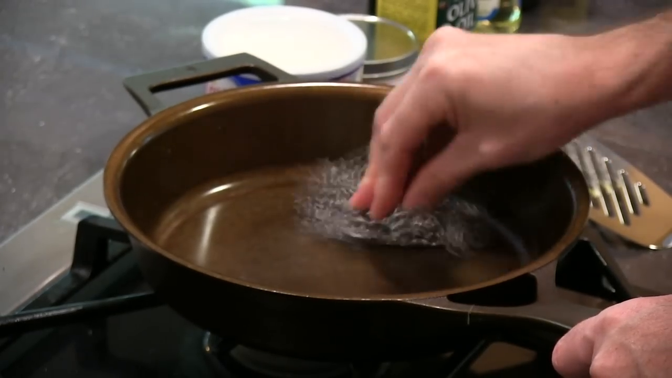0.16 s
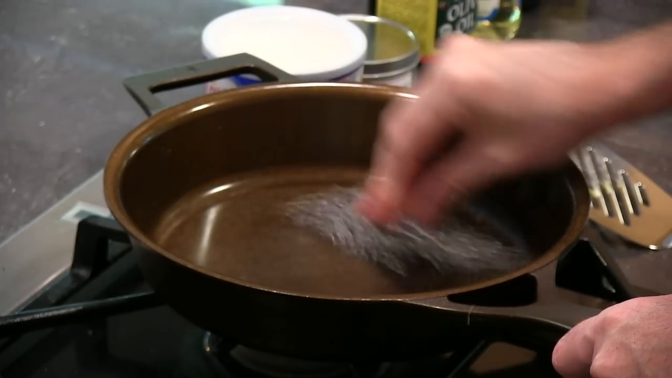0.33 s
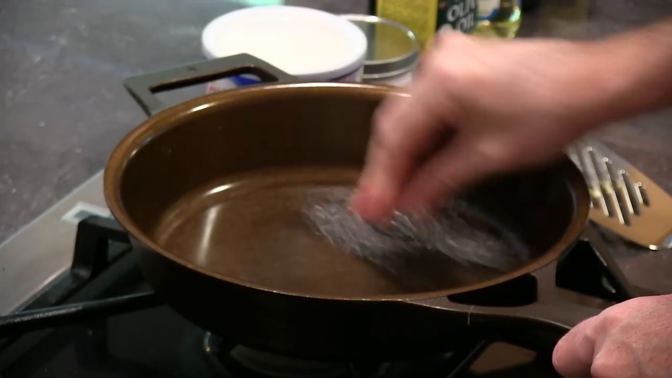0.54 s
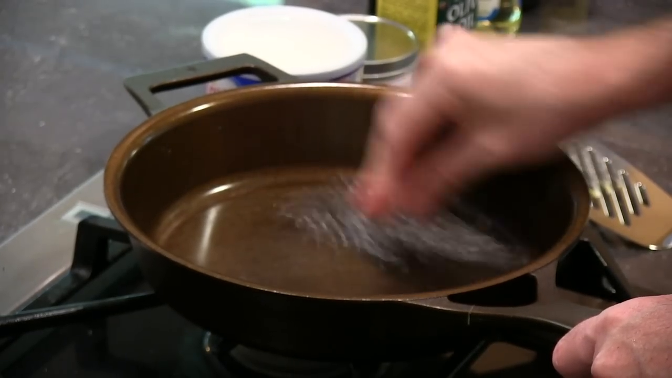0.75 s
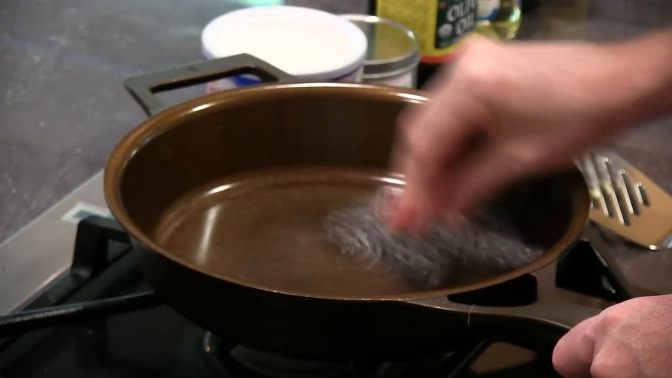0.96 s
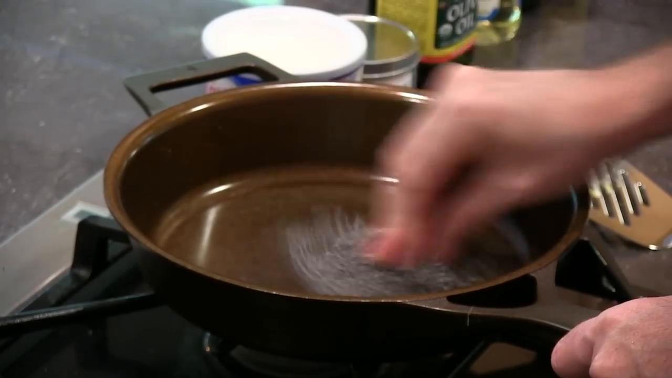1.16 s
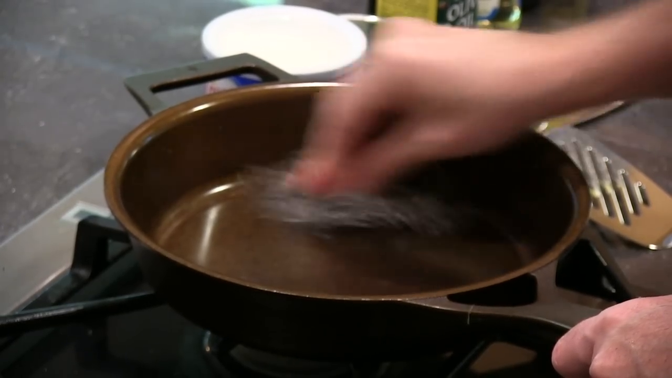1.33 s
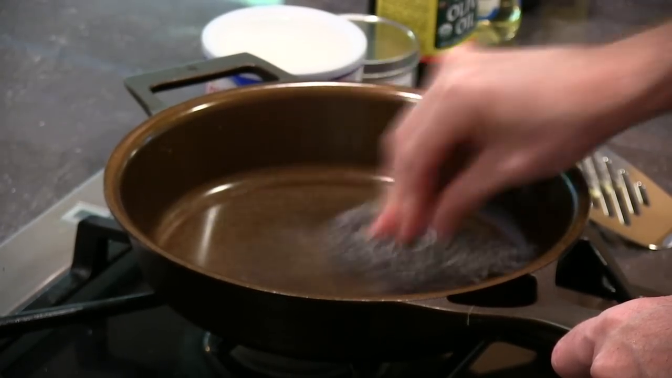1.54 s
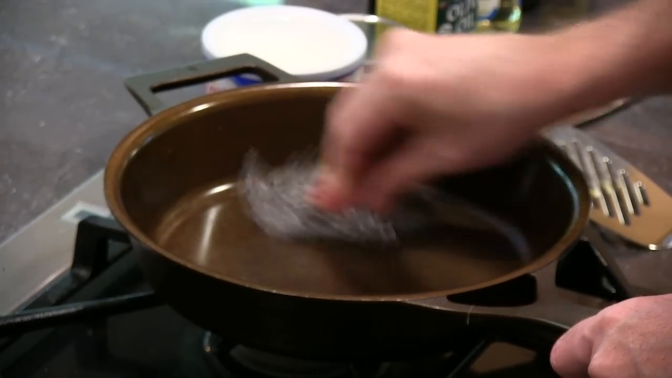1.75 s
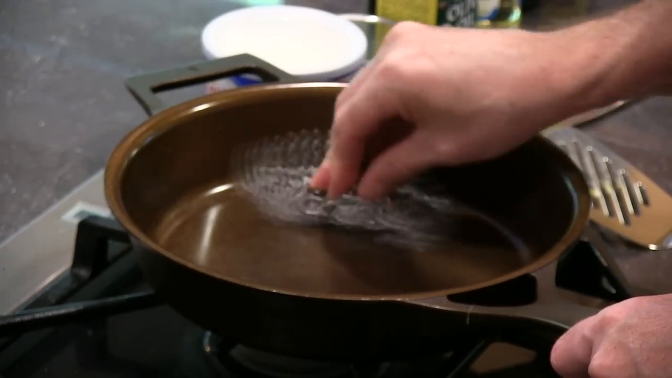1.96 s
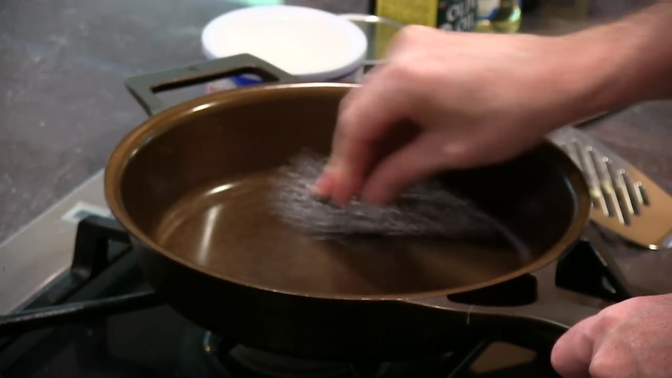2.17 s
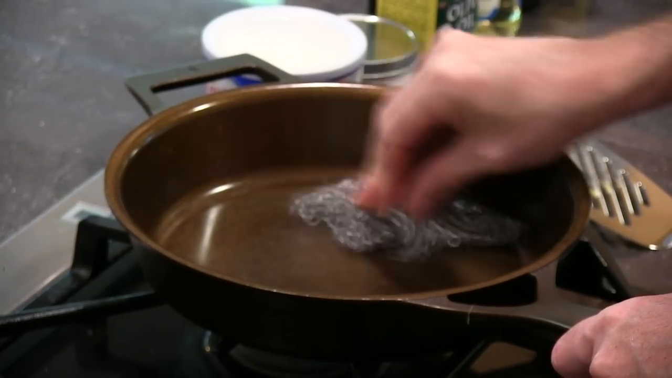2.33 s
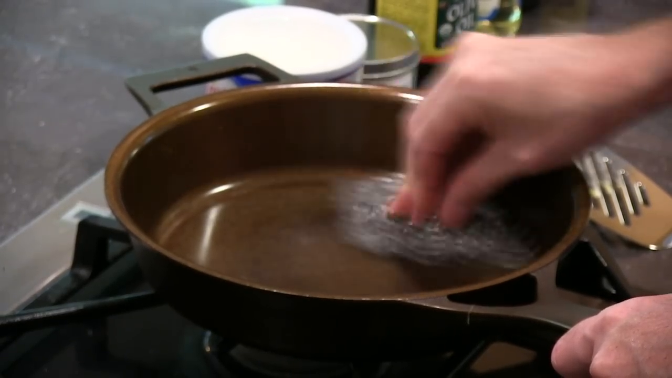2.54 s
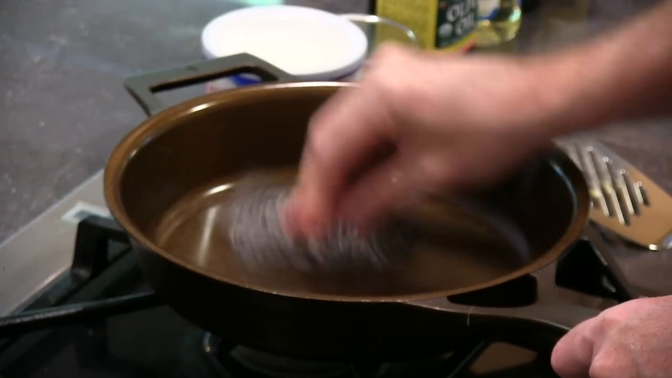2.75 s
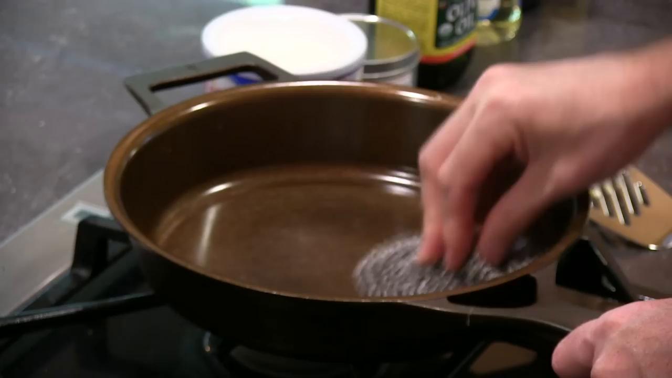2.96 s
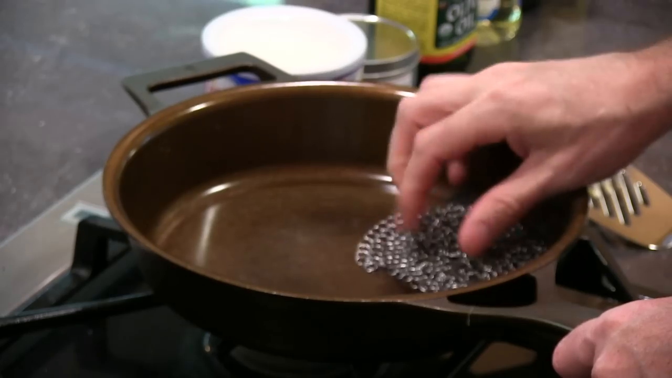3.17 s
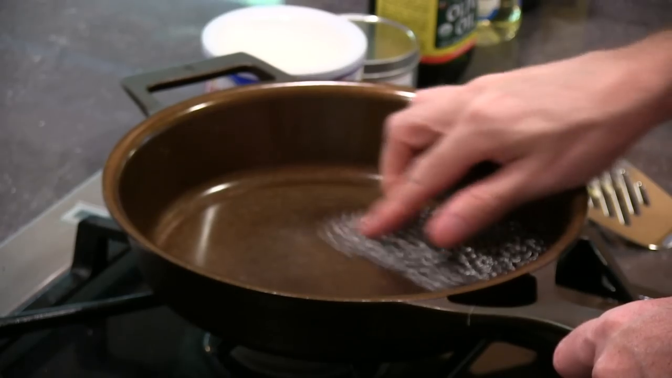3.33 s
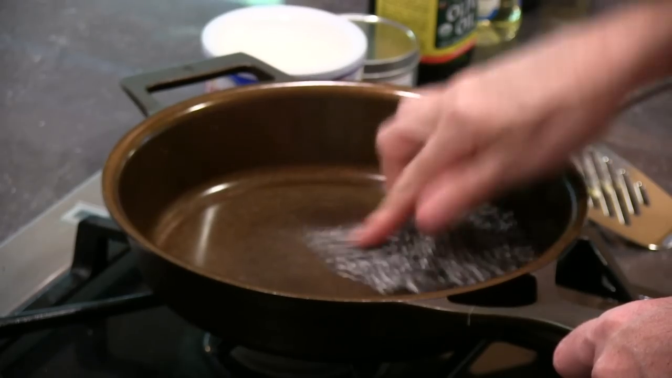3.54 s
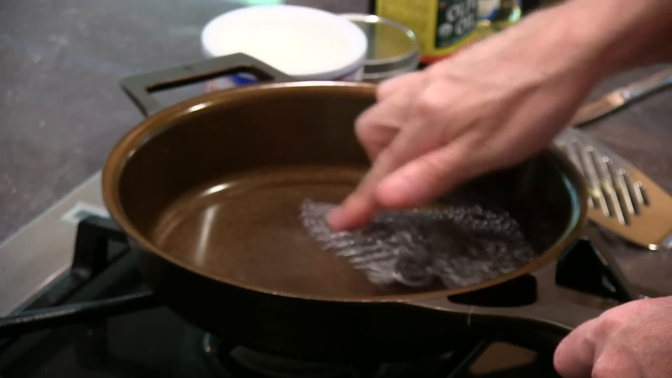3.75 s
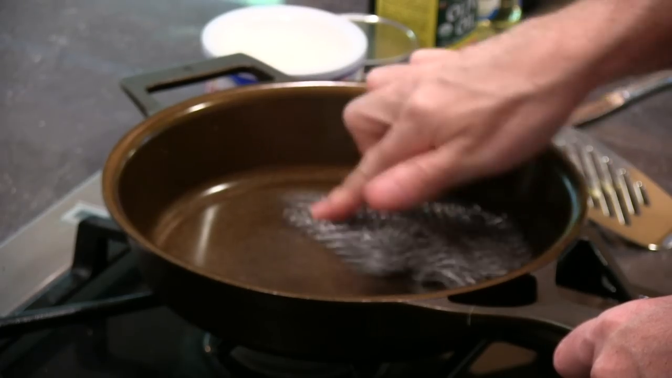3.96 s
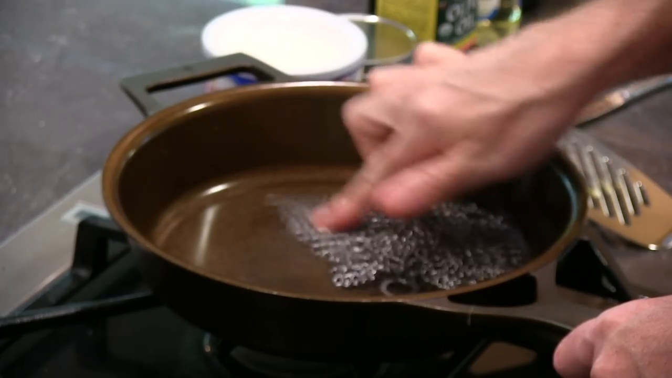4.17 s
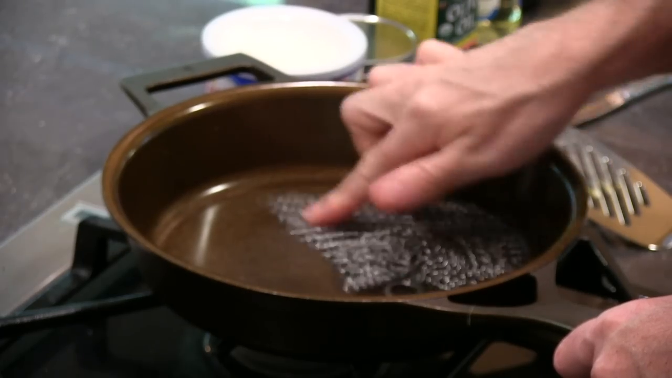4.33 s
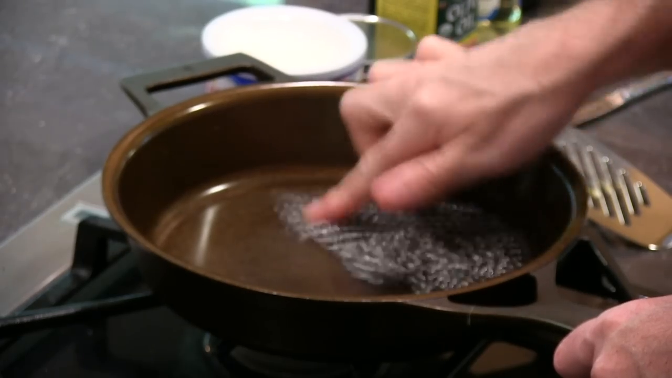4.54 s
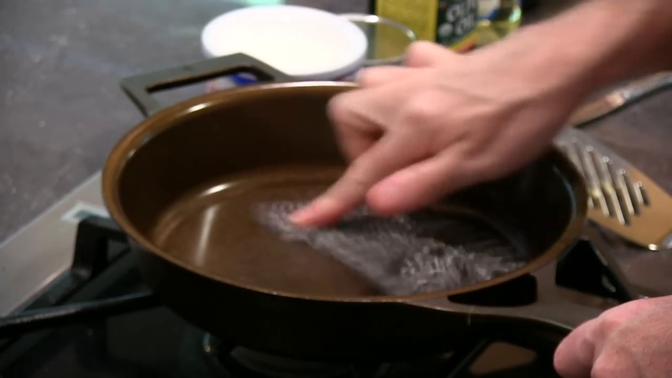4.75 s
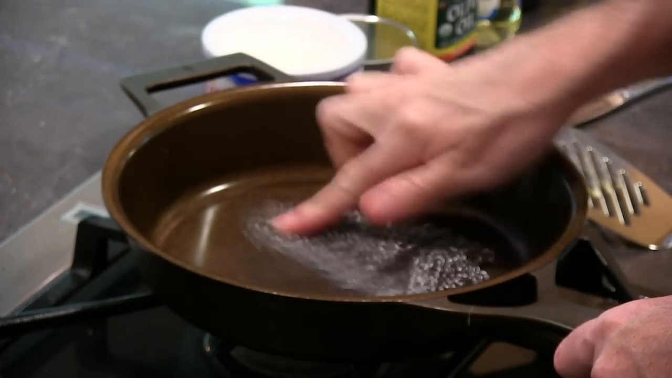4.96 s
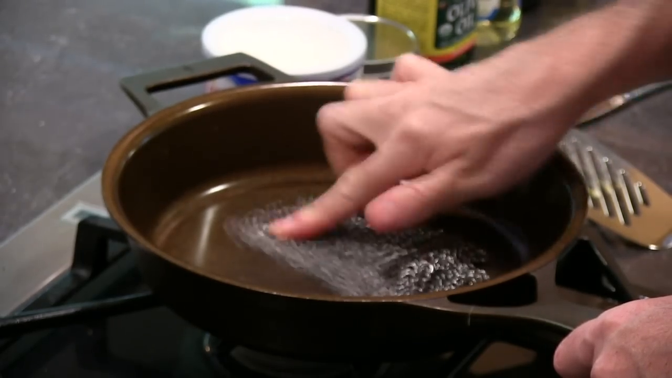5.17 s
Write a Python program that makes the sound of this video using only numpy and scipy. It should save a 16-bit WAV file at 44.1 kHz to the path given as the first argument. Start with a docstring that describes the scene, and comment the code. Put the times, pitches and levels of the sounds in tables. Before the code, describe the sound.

Steel rings jingle and rasp against a ringing iron pan in quick circles, pausing briefly as the pan knocks on the stove grate.

```python
"""Chainmail scrubber on cast iron

A bunch of mail is swirled round a pan on a stove, let go near 3 s, then pushed flat with the fingertips.
Thousands of tiny contacts a second make the steel rings jingle and the iron ring; rings tumble in flurries.
The hand's weight thuds through the stove and the pan knocks on its grate a few times.
Small kitchen, low hum, one close microphone."""
import sys
import numpy as np
from scipy import signal
from scipy.fft import rfft, irfft
from scipy.io import wavfile

SR = 44100
rng = np.random.default_rng(int(sys.argv[2]) if len(sys.argv) > 2 else 0)


def pcm_store(signal):
    """Save signal as 16-bit PCM."""
    levels = np.round(np.clip(np.atleast_2d(signal), -1, 1) * 32767)
    wavfile.write(sys.argv[1], SR, levels.astype(np.int16).T)


N = 229578
T = np.arange(N) / SR
LET_GO_S, REST_S, LAND_S = 2.767, 3.03, 3.153  # hand lets go, mail settles, fingertips land
FLAT = T > LAND_S  # mail bunched before, flat after

# swirling the bunched mail: (time [s], effort [dB], main mode gain [dB])
SWIRL_PATH = [(0, -28.5, 0), (.6, -28.5, 1.5), (1.13, -29, -5.5), (1.33, -29.5, 2.5), (1.55, -29, -9.5),
              (1.67, -33, -1), (2.3, -33.5, -0.5), (2.56, -30, -3.5), (2.8, -27, -5.5)]
# pushing the flat mail: (time [s], effort [dB], main mode gain [dB])
PUSH_PATH = [(3.17, -40, -12), (3.39, -36.5, -2.5), (3.6, -39, -6.5), (3.8, -30.5, -0.5), (4.1, -36.5, -6),
             (4.45, -31.5, -1.5), (4.65, -26, -2), (4.83, -29, -6.5), (5.21, -30, -1)]
# hand turns back, mail almost stops: (time [s], dip [dB])
HAND_STALLS = [(3.325, -4), (3.525, -8), (3.645, -5.5), (3.956, -11), (4.245, -9), (5.008, -5.5)]
# bunched, then flat: (time at most resonant spot [s], circling rate [Hz], scrape [dB], edge [dB])
HAND_GRIPS = [(.27, 3.39, -40, -38.5), (3.37, 3.18, -38.5, -39.5)]
# rings tumble over or slap down: (time [s], level [dB], length [s])
RING_FLURRIES = [(.111, -25, 0.01), (.14, -23, .02), (.255, -36, .022), (.3485, -27, 0.011),
                 (.492, -22.5, 0.017), (.52, -26, 0.0094), (.553, -22.5, .016), (.61, -34, 0.0064),
                 (.722, -32, .0063), (.775, -26, 0.033), (.9, -29, 0.012), (1.011, -23, 0.022),
                 (1.075, -26.5, 0.052), (1.225, -32, 0.023), (1.532, -26.5, 0.031), (1.81, -29.5, 0.026),
                 (3.153, -30, 0.013), (3.675, -29.5, 0.03), (3.762, -46, .006), (3.805, -26, 0.0083),
                 (3.875, -42, 0.0061), (4.02, -36, 0.0068), (4.19, -35.5, 0.031), (4.275, -32, .022),
                 (4.361, -34, 0.06), (4.488, -24.5, 0.01), (4.598, -23, 0.022), (4.658, -23.5, 0.018),
                 (4.736, -27, .006), (4.912, -29, .011), (5.021, -24.5, .0077)]
# mail bites into the iron: (time [s], level [dB], length [s])
MAIL_CATCHES = [(.205, -32.5, 0.0089), (.402, -32, 0.017), (.617, -30.5, 0.0082), (.785, -34.5, 0.0099),
                (.825, -34, .01), (.861, -25, 0.0022), (1.066, -28.5, 0.013), (1.165, -34.5, .012),
                (1.665, -29, 0.0026), (2.605, -34, 0.018), (3.154, -34, 0.0042), (3.39, -40, 0.012),
                (3.58, -40.5, 0.049), (3.81, -33.5, 0.018), (3.98, -32, 0.0046), (4.617, -31.5, 0.018),
                (4.664, -32, 0.013)]
# bare ring-on-ring contacts: (frequency [Hz], level [dB])
TICK_SPECTRUM = [(1500, -47.5), (3500, -9.5), (5600, -7.5), (6500, -3.5), (8000, -3), (11000, -2.5),
                 (14500, -4.5), (16000, -1)]
# partials of the bunched mail: (frequency [Hz], bandwidth [Hz], level [dB])
BUNCHED_MODES = [(6200, 26, -12), (6560, 50, 1), (7240, 150, 3.5), (7750, 58, -25), (7880, 78, -6),
                 (8000, 64, 5), (8300, 42, -22), (8850, 400, -1), (9700, 86, -8), (9670, 134, -0.5),
                 (11070, 310, 2), (11500, 105, 0), (12600, 22, -9), (12700, 150, 4.5), (12900, 100, -14),
                 (14200, 90, 5.5), (14200, 56, -13), (14700, 130, 5), (15600, 100, -6), (15600, 66, -12)]
# partials of the flat mail: (frequency [Hz], bandwidth [Hz], level [dB])
FLAT_MODES = [(6540, 27, 2.5), (7150, 60, -2), (7790, 64, -0.5), (8150, 130, -6), (8930, 150, 0),
              (9730, 89, -19), (9800, 26, -6), (10630, 37, 0), (11450, 300, -1), (12850, 53, -4),
              (12960, 94, -1.5), (14200, 52, -1), (14100, 100, -5), (15500, 74, -5)]
# rings rubbing on iron: (frequency [Hz], level [dB])
SCRAPE_SPECTRUM = [(150, -46), (340, -24), (440, -13.5), (520, 2.5), (780, 2.5), (900, -13.5), (1150, 1.5),
                   (1400, -2.5), (1750, -2), (2200, -14.5), (4000, -21.5)]
# low pan modes: (frequency [Hz], bandwidth [Hz], level [dB])
PAN_LOW_MODES = [(528.8, 17.5, -6), (679, 13, -28), (827, 43, -11.5), (1110, 30, -5), (1596, 53, -0.5),
                 (1680, 35, -8), (1950, 56, -9.5)]
# main mode of the pan floor, a close pair: (frequency [Hz], bandwidth [Hz], level [dB])
PAN_MAIN_MODES = [(1047.4, 20.4, 5.5), (1056.5, 11.8, 1)]
# hardest contacts on iron: (frequency [Hz], level [dB])
EDGE_SPECTRUM = [(1200, -15.5), (2200, 6.5), (3000, 5.5), (3800, 2.5), (5000, 4), (6000, 5.5), (8000, -28)]
# high pan modes: (frequency [Hz], bandwidth [Hz], level under bunched mail [dB], under flat mail [dB])
PAN_HIGH_MODES = [(2348, 56, -5.5, -4.5), (2779, 49, 0.5, 3.5), (2947, 120, -7.5, -15), (3280, 44, 0.5, -2),
                  (3500, 46, -7, -4), (3590, 4.4, -4.5, -23), (4040, 71, 0, 2), (4280, 31, -6.5, -15),
                  (4593, 70, -1, -2), (4707, 29, 1, 0.5), (5110, 64, -15, -8), (5330, 100, -7.5, -6.5),
                  (6340, 116, -1, -11)]
# kitchen background: (frequency [Hz], level [dB])
RUMBLE_SPECTRUM = [(20, -5.5), (35, -1), (70, -12), (95, -13), (125, -9), (170, -19.5), (330, -23.5),
                   (1000, -23), (4000, -36), (15000, -78)]
# hand's weight on the stove: (time [s], level [dB])
STOVE_THUDS = [(0.11, -40), (0.507, -41), (0.619, -46), (0.721, -42), (1.001, -40), (3.157, -33.5)]
# pan shifts on the grate: (time [s], thump [dB], clack [dB], cut-off [Hz])
PAN_KNOCKS = [(2.67, -13, 1, 900), (2.703, -11, -18, 700), (3.044, -15, -15, 4000), (3.051, -7.5, 1, 398),
              (3.069, -15, -1.5, 1260), (3.093, -9.5, -20, 700), (3.259, -19, -5, 498),
              (3.274, -14.5, -4, 1010), (4.488, -17, -4, 720)]
# grate and stove: (frequency [Hz], bandwidth [Hz], level [dB])
GRATE_MODES = [(135, 27, 4.5), (188, 21, 0), (248, 7.3, -0.5), (426, 19, -0.5)]
# pan struck from below: (frequency [Hz], bandwidth [Hz], level [dB])
CLACK_MODES = [(508, 16, -10), (605, 45, -4), (654, 11, 6), (740, 35, -20), (788, 43, -1), (860, 51, -14),
               (1010, 88, 0), (2510, 340, -0.5), (3900, 450, 2.5)]


def undb(db):
    """Decibels to gain."""
    return 10 ** (np.asarray(db) / 20)


def unit_rms(x):
    """Scale to rms 1."""
    return x / np.sqrt(np.mean(x ** 2))


def drift(rate_hz):
    """Slow random curve, rms 1."""
    return unit_rms(np.interp(T * rate_hz, np.arange(4096), rng.standard_normal(4096)))


def convolve(x, response):
    """Convolve with the response scaled to unit energy."""
    return signal.fftconvolve(x, response / np.linalg.norm(response))[:N]


def colour(x, spectrum, size=4096):
    """Minimum-phase filter shaped like the spectrum, via the cepstrum."""
    hz, db = np.transpose(spectrum)
    bins_hz = np.maximum(np.arange(size // 2 + 1) * SR / size, 1)
    gain = undb(np.interp(np.log(bins_hz), np.log(hz), db))
    cepstrum = irfft(np.log(gain))
    cepstrum[1:size // 2] *= 2
    cepstrum[size // 2 + 1:] = 0
    return convolve(x, irfft(np.exp(rfft(cepstrum))))


def resonate(x, hz, width_hz):
    """One mode, gain 1 at centre."""
    return signal.lfilter(*signal.iirpeak(hz, hz / width_hz, SR), x)


def ring_modes(hits, modes, drift_db, drift_hz):
    """Each contact's spot feeds each mode differently; the mix drifts as the mail travels."""
    out, power = np.zeros(N), 0
    for hz, width_hz, db in modes:
        coupling = np.sqrt(2) * np.resize(np.cos(2 * np.pi * rng.random(50021)), N)
        wander = unit_rms(undb(drift_db * drift(drift_hz)))
        out += undb(db) * resonate(hits * coupling * wander, hz, width_hz)
        power += undb(db) ** 2 * np.pi * width_hz / SR
    return out / np.sqrt(power)


def contacts(per_s, spread_db):
    """Random impacts of either sign: many small, few large."""
    size = undb(spread_db * np.minimum(rng.exponential(size=N), 4))
    occurs = rng.random(N) < per_s / SR
    return unit_rms(occurs * size * rng.choice([-1, 1], N))


def slips(per_s, fade_s, share):
    """Rings snag and release: force jumps at each slip, then decays."""
    jumps = (rng.random(N) < per_s / SR) * rng.exponential(size=N)
    power = signal.lfilter([1], [1, -np.exp(-1 / (fade_s * SR))], jumps)
    return np.sqrt(1 - share + share * power / power.mean())


def bursts(events, rise_s, size=8192):
    """Envelope of short contact runs: fast rise, Gaussian fall."""
    out, age_s = np.zeros(N + size), T[:size]
    rise = 1 - np.exp(-age_s / rise_s)
    for time_s, db, length_s in events:
        start = int(time_s * SR)
        out[start:start + size] += undb(db) * rise * np.exp(-(age_s / length_s) ** 2 / 2)
    return out[:N]


def hand(coast_db_per_s=75, stall_s=0.011):
    """Effort and main mode gain: swirl, coast, then push with stalls."""
    swirl_s, swirl_db, swirl_main_db = np.transpose(SWIRL_PATH)
    push_s, push_db, push_main_db = np.transpose(PUSH_PATH)
    coast_db = coast_db_per_s * np.maximum(T - LET_GO_S, 0)
    effort_db = np.where(FLAT, np.interp(T, push_s, push_db), np.interp(T, swirl_s, swirl_db) - coast_db)
    main_db = np.where(FLAT, np.interp(T, push_s, push_main_db), np.interp(T, swirl_s, swirl_main_db))
    stall_db = sum(db * np.exp(-((T - time_s) / stall_s) ** 2 / 2) for time_s, db in HAND_STALLS)
    return effort_db + stall_db, main_db


def mail_forces(usual_effort_db=-29.5, settle_db_per_s=190):
    """Effort shakes loose rings and drags pressed ones past the most resonant spot once a circle."""
    effort_db, main_db = hand()
    moving = undb(-settle_db_per_s * np.maximum(T - REST_S, 0) * ~FLAT)
    spot_s, circle_hz, scrape_db, edge_db = (
        np.where(FLAT, flat, bunched) for bunched, flat in zip(*HAND_GRIPS))
    circle = np.cos(2 * np.pi * circle_hz * (T - spot_s))
    extra_db = effort_db - usual_effort_db
    loose = moving * undb(effort_db)
    # the iron follows effort less than the loose rings do
    pressed = moving * undb(scrape_db + 0.54 * extra_db + 0.2 * circle)
    hard = moving * undb(edge_db + 0.81 * extra_db)
    return loose, pressed, hard, undb(main_db + 1.8 * circle)


def jingle(force):
    """Loose rings click together, each with its own thin, short note."""
    hits = force * contacts(per_s=10000, spread_db=2)
    bunched = ring_modes(hits * ~FLAT, BUNCHED_MODES, drift_db=2.5, drift_hz=12)
    flat = ring_modes(hits * FLAT, FLAT_MODES, drift_db=1.2, drift_hz=12)
    note_modes = [(hz, 60, 0) for hz in rng.uniform(6000, 15700, 32)]
    notes = ring_modes(hits, note_modes, drift_db=4.5, drift_hz=18)
    return undb(-2.5) * (colour(hits, TICK_SPECTRUM) + bunched) + undb(-5) * flat + undb(-10.5) * notes


def scrape(force, catch, main_gain):
    """Pressed rings bump over the iron's grain and ring its low modes, hardest at a catch."""
    grain = contacts(per_s=5000, spread_db=0.86)
    rub = grain * np.hypot(force, undb(-5) * catch)
    bite = grain * np.hypot(force, undb(2) * catch)
    low = ring_modes(bite, PAN_LOW_MODES, drift_db=0.7, drift_hz=10)
    main = main_gain * ring_modes(bite, PAN_MAIN_MODES, drift_db=1.2, drift_hz=14)
    return undb(-3.5) * colour(rub, SCRAPE_SPECTRUM) + undb(-5) * low + undb(-1.8) * main


def hard_edge(force):
    """The hardest contacts ring the high pan modes; the lie of the mail sets the mix."""
    hits = force * contacts(per_s=5000, spread_db=3.1)
    modes = [(hz, width_hz, np.where(FLAT, flat_db, bunched_db))
             for hz, width_hz, bunched_db, flat_db in PAN_HIGH_MODES]
    high = ring_modes(hits, modes, drift_db=1.5, drift_hz=9)
    return undb(-9) * colour(hits, EDGE_SPECTRUM) + undb(-1) * high


def room_tail(t60_s=0.6, length_s=0.5):
    """Diffuse reflections from one spot; treble dies sooner."""
    age_s = T[:int(length_s * SR)]
    noise = rng.standard_normal(len(age_s))
    low = signal.sosfilt(signal.butter(1, 4000, fs=SR, output="sos"), noise)
    low_tail = low * 1000 ** (-age_s / t60_s)
    high_tail = (noise - low) * 1000 ** (-age_s / (0.28 * t60_s))
    return (age_s > 0.003) * (low_tail + high_tail)


def room(x, circle_hz=2.51, wet_db=-10):
    """Reflections shift between two spots as the mail circles."""
    angle = np.pi * circle_hz * T
    wet = convolve(x * np.cos(angle), room_tail()) + convolve(x * np.sin(angle), room_tail())
    return x + undb(wet_db) * wet


def background(hum_hz=53.4, hum_db=-54, rumble_db=-51):
    """Appliance hum and low rumble."""
    hum = np.sqrt(2) * np.sin(2 * np.pi * hum_hz * T) * undb(hum_db + drift(rate_hz=3))
    return hum + undb(rumble_db) * colour(rng.standard_normal(N), RUMBLE_SPECTRUM)


def stove_thuds(sway_hz=36, fade_s=0.018):
    """The stove sways a cycle or two under the hand."""
    out = np.zeros(N)
    for time_s, db in STOVE_THUDS:
        age_s = np.maximum(T - time_s, 0)
        out += undb(db + 5.5) * np.sin(2 * np.pi * sway_hz * age_s) * np.exp(-age_s / fade_s)
    return out


def pan_knocks(rattle_s=0.0044, rattle_db=-18):
    """Blunt pan-on-grate blows thump the stove; a brief rattle clacks the iron."""
    thump, clack = np.zeros(N), np.zeros(N)
    for time_s, thump_db, clack_db, cutoff_hz in PAN_KNOCKS:
        blow = signal.unit_impulse(N, int(time_s * SR))
        decay = (T > time_s) * np.exp(-np.abs(T - time_s) / rattle_s)
        rattle = undb(rattle_db) * decay * rng.standard_normal(N)
        lowpass = signal.butter(2, cutoff_hz, fs=SR, output="sos")
        thump += undb(thump_db) * signal.sosfilt(lowpass, blow)
        clack += undb(clack_db) * signal.sosfilt(lowpass, blow + rattle)
    grate = sum(undb(db) * resonate(thump, hz, width_hz) for hz, width_hz, db in GRATE_MODES)
    iron = sum(undb(db) * resonate(clack, hz, width_hz) for hz, width_hz, db in CLACK_MODES)
    return undb(17.5) * grate + undb(8.5) * iron + undb(-17) * clack


def scene():
    """Scrubbing and knocks in the room, plus thuds and background; same on both channels."""
    loose, pressed, hard, main_gain = mail_forces()
    flurry = bursts(RING_FLURRIES, rise_s=0.0013)
    catch = bursts(MAIL_CATCHES, rise_s=0.00047)
    tumble = slips(per_s=350, fade_s=0.0064, share=0.26)
    snag = slips(per_s=160, fade_s=0.0068, share=0.4)
    accents = undb(-12) * flurry + undb(-3.5) * catch
    scrubbing = jingle(np.hypot(undb(1) * loose, flurry) * tumble)
    scrubbing += scrape(pressed * snag, catch, main_gain)
    scrubbing += hard_edge(np.hypot(hard * (snag + tumble) / 2, accents))
    mono = room(scrubbing + pan_knocks()) + stove_thuds() + background()
    return np.array([mono, mono])


def record(dry):
    """Steep low-pass at 15.75 kHz."""
    return signal.sosfilt(signal.ellip(12, 0.1, 80, 15750, fs=SR, output="sos"), dry)


dry = scene()
out = record(dry)
pcm_store(out)
```